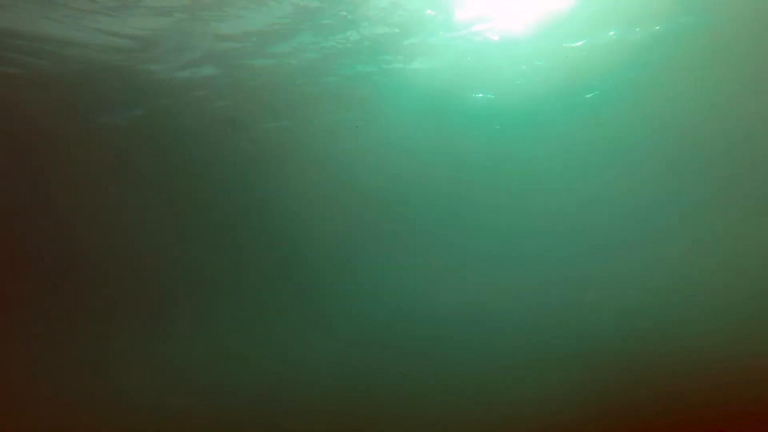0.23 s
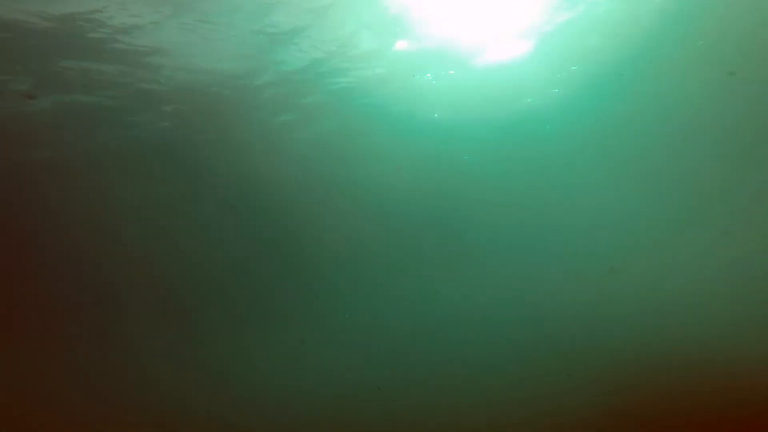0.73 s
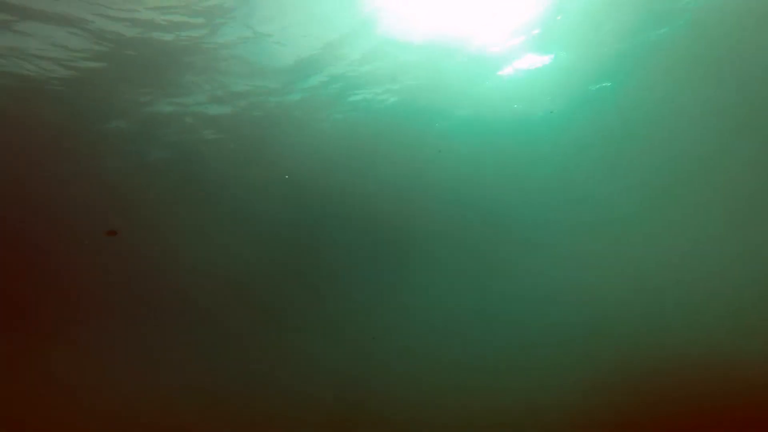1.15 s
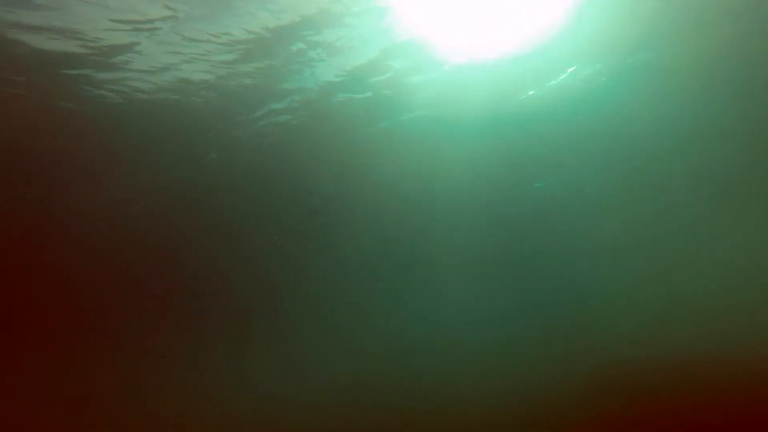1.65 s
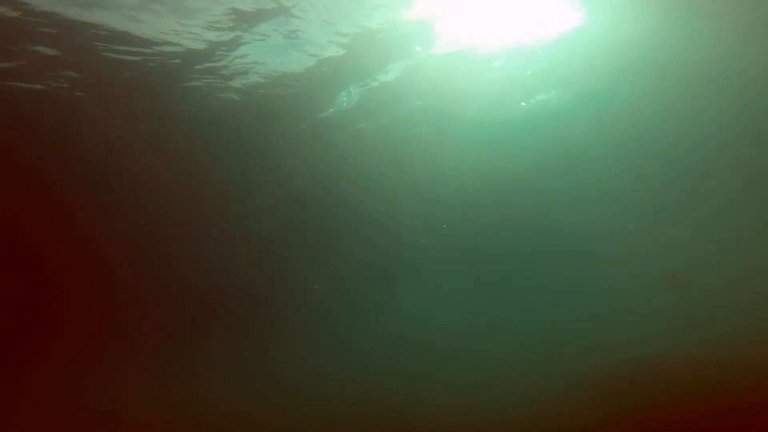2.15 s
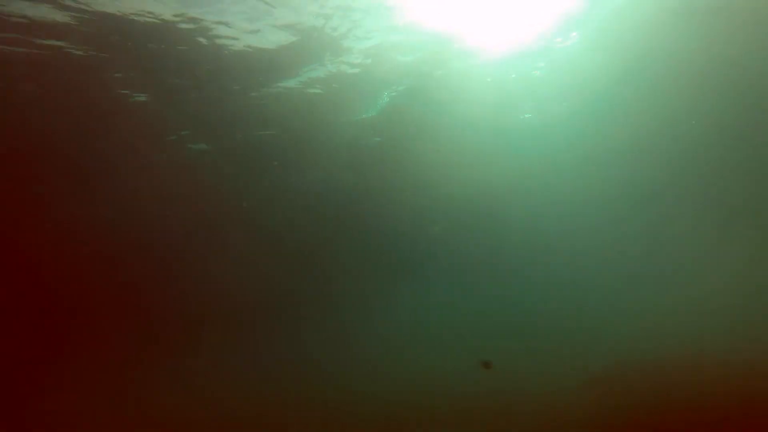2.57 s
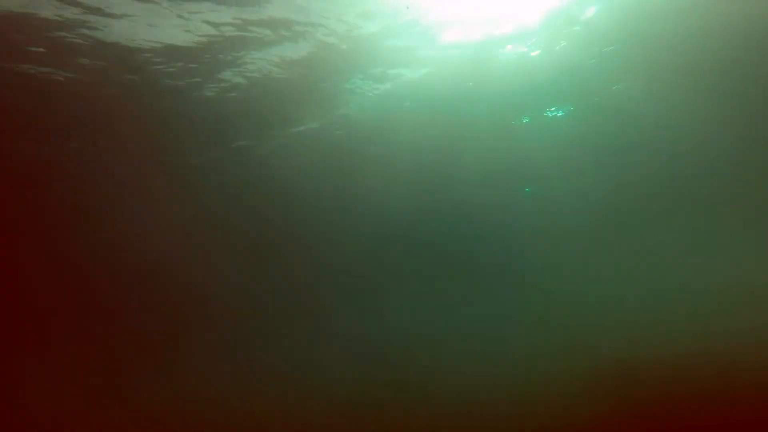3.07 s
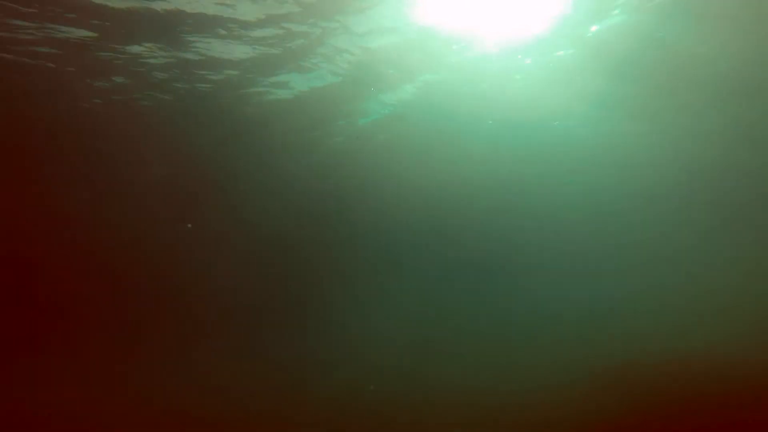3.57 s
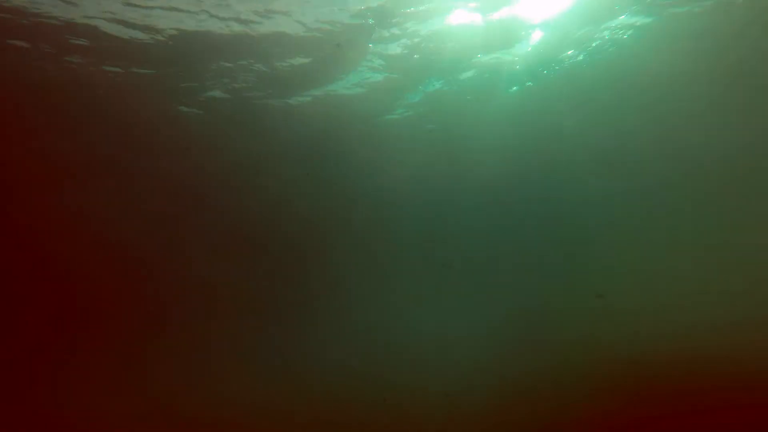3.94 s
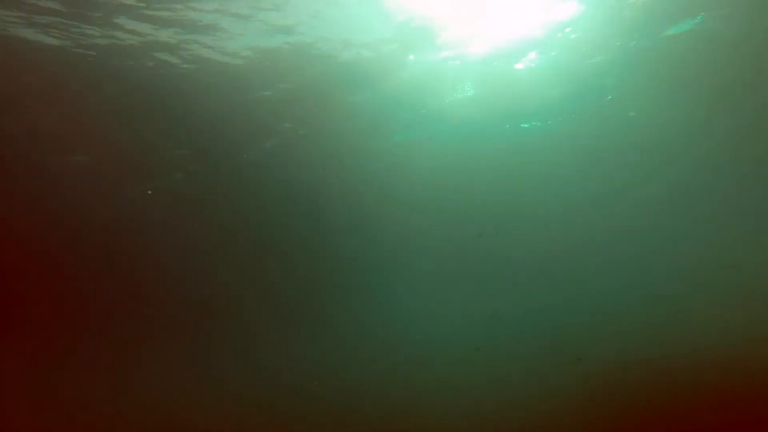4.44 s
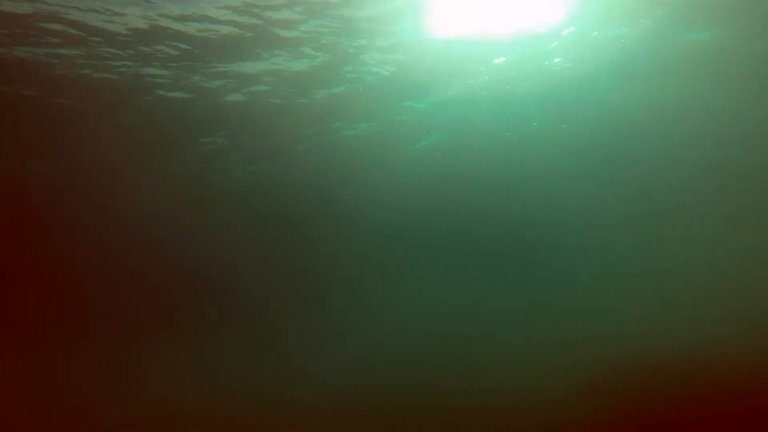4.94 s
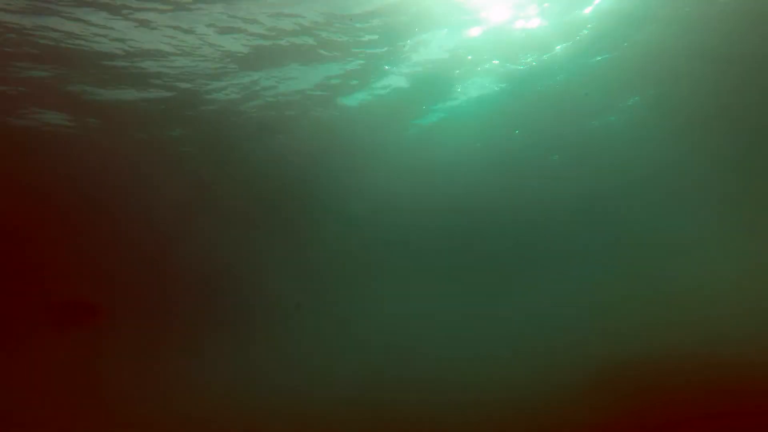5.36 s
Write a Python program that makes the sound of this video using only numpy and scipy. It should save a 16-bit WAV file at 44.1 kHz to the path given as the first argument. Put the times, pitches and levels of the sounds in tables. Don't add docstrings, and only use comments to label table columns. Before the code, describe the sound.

Muffled stones tumble on a sea floor, knocking a hollow housing and ticking sharply, as an early rumble of current fades away.

```python
import sys
import numpy as np
from scipy import signal
from scipy.fft import rfft, irfft, next_fast_len
from scipy.io import wavfile
from scipy.ndimage import uniform_filter1d

SR = 44100
rng = np.random.default_rng(int(sys.argv[2]) if len(sys.argv) > 2 else 0)


def output_pcm(signal):
    pcm = np.clip(np.atleast_2d(signal).T, -1, 1) * 32767
    wavfile.write(sys.argv[1], SR, np.round(pcm).astype(np.int16))


def volts_from_decibels(level):
    exponent = np.asarray(level, float) / 20
    return 10 ** exponent


N = 246959
SPLIT_HZ, TOP_HZ, EDGE_HZ = 4200, 11500, 15280


def evened(x):
    return x / np.sqrt(np.mean(x ** 2) + 1e-20)


def curve(rows):
    return np.interp(np.arange(N) / SR, *np.transpose(rows))


def add(mix, s, sound):
    part = mix[max(round(s * SR), 0):][:len(sound)]
    part += sound[:len(part)]


def burst(ms, rise, fall):
    t = np.arange(-2 * ms, 6 * ms, 1000 / SR) / ms
    shape = np.where(t < 0, np.exp(-(t / rise) ** 2), 1 / np.cosh(t / fall))
    return t * ms / 1000, shape


def lingering(x, rings):
    after = 0
    for hz, width, db in rings:
        after = after + volts_from_decibels(db) * signal.lfilter(*signal.iirpeak(hz, hz / max(width, 5), SR), x)
    return x + after


def above(x, hz, soft):
    size = next_fast_len(len(x) + SR // 4)
    step = np.tanh((np.fft.rfftfreq(size, 1 / SR) - hz) / soft)
    return irfft(rfft(x, size) * (1 + step) / 2, size)[:len(x)]


def colour(x, points, size=8192):
    f, db = np.transpose(points)
    hz = abs(np.fft.fftfreq(size, 1 / SR))
    gain_db = np.interp(np.log(hz + 1), np.log(f + 1), db)
    log_gain = np.log(volts_from_decibels(np.maximum(gain_db, -100)))
    taps = np.fft.ifft(np.exp(np.conj(signal.hilbert(log_gain)))).real[:size // 2]
    led_in = np.concatenate([x[-len(taps):], x])
    return signal.oaconvolve(led_in, taps / np.linalg.norm(taps))[len(taps):][:len(x)]


def scrambled(x):
    z = signal.stft(x, nperseg=128)[2]
    z = z * np.exp(2j * np.pi * rng.random(z.shape[::-1]).T)
    return signal.istft(z, nperseg=128)[1][:N]


def thuds(stones):
    # (pitch [Hz], width [Hz], level [dB])
    bed_ring = [(198, 98, -11.5), (308.5, 30, -6.5)]
    small, deep = np.zeros((2, N))
    for (s, db, hz, ms), (a, b) in zip(stones, rng.random((len(stones), 2))):
        t, shape = burst(ms, rise=0.45, fall=0.26)
        turns = hz * t * (1 - 1.4 * t)
        cycles = np.sin(2 * np.pi * (turns + a)) + 0.27 * np.sin(2 * np.pi * (1.48 * turns + b))
        add(deep if hz < 140 else small, s + t[0], volts_from_decibels(db - 2.5) * shape * cycles)
    return above(lingering(small, bed_ring), 133.5, soft=14) + above(deep, 75, soft=18)


def falling_stones():
    # (peak time [s], peak level [dB], pitch [Hz], length [ms])
    heavy = [(0.094, -30, 270, 8.7), (0.3, -32, 253, 3.5), (0.49, -30, 236, 2.8), (0.503, -28, 189, 10.6),
             (0.549, -29.5, 176, 13), (0.551, -33, 352, 10), (0.555, -25.5, 131, 21.5),
             (0.568, -27, 184, 3.4), (0.965, -30.5, 223, 8.7), (0.98, -22.5, 207, 5),
             (1.204, -35.5, 109.6, 45), (1.283, -29, 280, 4.9), (1.309, -31, 217, 3.6),
             (1.341, -29, 224, 3.3), (1.779, -34.5, 386, 13.6), (2.257, -33.5, 290, 7.3),
             (2.289, -38.5, 174, 12.5), (2.551, -32.5, 270, 6.2), (2.687, -34.5, 248, 11),
             (2.807, -25, 298, 5.3), (2.84, -30.5, 233, 7.6), (3.056, -39, 109.4, 53),
             (3.165, -37, 244, 7.9), (3.52, -31, 220, 4.5), (3.537, -28, 172, 11), (3.571, -29, 333, 10.6),
             (3.847, -28, 172, 10), (3.867, -39.5, 186, 36), (4.816, -24.5, 193, 12), (5.006, -40, 315, 13)]
    # (peak time [s], peak level [dB], pitch [Hz])
    pebbles = [(0.176, -39, 284), (0.44, -33, 292), (0.707, -39, 142), (1.481, -36.5, 308),
               (1.621, -43.5, 307), (1.95, -42, 360), (2.001, -36, 355), (2.138, -36, 260),
               (2.167, -42, 256), (2.369, -38, 270), (2.422, -43, 343), (2.922, -39, 165), (2.97, -42, 260),
               (3.042, -36.5, 162), (3.27, -35.5, 243), (3.337, -42.5, 248), (3.395, -40, 235),
               (3.598, -41.5, 224), (3.783, -39.5, 354), (3.83, -42, 236), (3.955, -38, 260),
               (3.984, -37.5, 290), (4.026, -42, 245), (4.188, -40, 198), (4.194, -38.5, 430),
               (4.324, -39.5, 241), (4.455, -44, 235), (4.628, -42.5, 250), (4.981, -43, 266),
               (5.325, -43, 252), (5.529, -42.5, 257)]
    # (peak time [s], peak level [dB], pitch [Hz])
    nudges = [(0.255, -44, 255), (0.36, -43, 295), (0.4, -37, 298), (0.47, -44, 199), (0.524, -40, 265),
              (0.585, -47, 297), (0.617, -52, 276), (0.657, -40.5, 195), (0.843, -46, 215),
              (0.902, -44, 240), (0.94, -42, 260), (0.996, -49, 202), (1.016, -42, 308), (1.04, -42, 201),
              (1.107, -39.5, 252), (1.194, -36.5, 293), (1.237, -41.5, 344), (1.252, -45, 240),
              (1.324, -44, 272), (1.375, -52, 308), (1.435, -42.0, 258), (1.524, -43.5, 352),
              (1.691, -40.5, 350), (1.708, -48, 356), (1.751, -43, 302), (1.88, -58, 286),
              (1.919, -44.5, 343), (2.08, -43, 366), (2.203, -47, 333), (2.219, -62, 279),
              (2.339, -38.5, 386), (2.463, -46, 280), (2.565, -54, 256), (2.654, -46, 292),
              (2.779, -46, 272), (2.857, -45, 258), (2.903, -41.5, 287), (3.104, -47, 277),
              (3.119, -42.5, 293), (3.194, -49, 267), (3.225, -48, 242), (3.413, -44, 259),
              (3.465, -44.5, 304), (3.717, -39, 295), (3.766, -40.5, 328), (3.884, -42, 188),
              (3.937, -44.5, 296), (4.066, -45.5, 288), (4.108, -47, 296), (4.291, -44, 240),
              (4.513, -44, 273), (4.54, -43.5, 274), (4.7, -47, 266), (4.72, -46, 273), (4.838, -50, 189),
              (4.992, -48, 297), (5.04, -41, 243), (5.082, -42, 309), (5.176, -47, 314), (5.261, -43, 254)]
    stones = heavy + [(s, db, hz, 1000 * 2.54 / hz) for s, db, hz in pebbles]
    stones += [(s, db - 0.45, hz, 1000 * 2.58 / hz) for s, db, hz in nudges]
    return thuds(stones)


def shoved_stones():
    # (peak time [s], peak level [dB], pitch [Hz])
    shoves = [(0.491, -34, 144), (0.5235, -54, 111), (0.5966, -46, 130), (0.6994, -34, 96),
              (0.7336, -51, 96), (0.8235, -39, 84), (0.9014, -45, 108), (0.984, -35, 126),
              (1.047, -38.5, 117), (1.102, -39, 128), (1.289, -38, 93)]
    # (peak time [s], peak level [dB], pitch [Hz])
    slides = [
        (0.248, -46, 261),
        (0.3624, -40.5, 300),
        (0.486, -35, 297),
    ]
    return thuds([(s, db + 3.5, hz, 1000 * 1.9 / hz) for s, db, hz in shoves + slides])


def knocks():
    # (peak time [s], peak level [dB], pitch [Hz], length [ms])
    strong = [(0.139, -32.5, 670, 3), (0.169, -31, 754, 3.1), (0.22, -32.5, 844, 5.5),
              (0.239, -39, 840, 7.9), (0.432, -37, 823, 9.1), (0.481, -35, 903, 8.8),
              (0.497, -31.5, 774, 5.5), (0.533, -38, 676, 9.3), (0.542, -26.5, 820, 5.4),
              (0.55, -26, 876, 7), (0.578, -23.5, 815, 3.6), (0.617, -31.5, 670, 6.8),
              (0.984, -36.5, 838, 7.9), (1.015, -39.5, 816, 7.4), (1.699, -34, 710, 1.8),
              (1.712, -46, 824, 29), (1.779, -36.5, 720, 5.7), (2.104, -41, 800, 4.2),
              (2.112, -37.5, 798, 8.4), (2.375, -40.5, 855, 9), (2.775, -37, 860, 3.2),
              (2.79, -44.5, 781, 33), (3.058, -44.5, 839, 26), (3.161, -28.5, 838, 2.6),
              (3.27, -31, 823, 5.2), (3.38, -35, 835, 4.3), (3.391, -40.5, 810, 9.3),
              (3.564, -38, 633, 6.9), (3.611, -41, 810, 3.5), (3.849, -29, 802, 6.9)]
    # (peak time [s], peak level [dB])
    taps = [(0.263, -42), (0.466, -46), (0.521, -47), (0.706, -41), (0.808, -40.5), (1.211, -42),
            (1.283, -45.5), (1.606, -46.5), (2.122, -42), (2.228, -43.5), (2.399, -40), (2.526, -43),
            (2.542, -42), (2.705, -44), (2.752, -45.5), (3.043, -42.5), (3.078, -42), (3.146, -39.5),
            (3.866, -45), (3.942, -47), (3.987, -46), (4.19, -43.5), (4.647, -48), (4.746, -41),
            (4.97, -47.5), (5.257, -44.5), (5.35, -40.5), (5.557, -42.5)]
    # (peak time [s], peak level [dB], pitch [Hz])
    patters = [(0.153, -41, 715), (0.252, -43, 794), (0.271, -45, 839), (0.442, -44, 850),
               (0.511, -36, 765), (0.567, -36, 736), (0.653, -46.5, 790), (0.719, -50, 840),
               (1.0, -45, 856), (1.025, -47.5, 900), (1.222, -44, 765), (1.236, -46.0, 806),
               (1.263, -44, 760), (1.291, -42, 654), (1.554, -46.5, 815), (1.671, -48, 776),
               (1.722, -43, 854), (1.751, -49, 840), (1.79, -42, 810), (1.798, -48, 786),
               (1.862, -46.5, 800), (1.879, -48.5, 770), (1.95, -48, 744), (1.991, -49, 834),
               (2.093, -44.5, 917), (2.154, -45.5, 810), (2.165, -49, 786), (2.265, -46, 770),
               (2.346, -42, 775), (2.418, -46.0, 790), (2.557, -43, 830), (2.639, -43, 680),
               (2.687, -44, 775), (2.716, -43, 760), (2.799, -46, 830), (2.812, -51, 790),
               (3.192, -44, 780), (3.302, -45.5, 800), (3.34, -44, 760), (3.401, -39.5, 800),
               (3.597, -41, 811), (3.604, -39, 830), (3.618, -53, 805), (3.784, -45, 750),
               (3.887, -44, 840), (3.899, -46, 796), (3.919, -47, 830), (3.93, -45, 790),
               (4.016, -48.0, 775), (4.052, -49, 800), (4.142, -47.5, 806), (4.201, -49, 770),
               (4.233, -46.0, 807), (4.587, -46, 810), (4.754, -52, 820), (4.816, -43.5, 760),
               (4.834, -44, 780), (4.904, -47.5, 850), (5.267, -47.5, 860), (5.276, -57, 860)]
    # (pitch [Hz], width [Hz], level [dB])
    housing_ring = [(760, 30, -10.5), (872, 31, -7.5)]
    tap_hz, tap_ms, patter_ms = 815, 7.8, 6.3
    blows = strong + [(s, db, tap_hz, tap_ms) for s, db in taps]
    blows += [(s, db - 0.3, hz, patter_ms) for s, db, hz in patters]
    ratios, sizes = (1.008, 0.797, 1.326, 1.586), (1.28, 0.39, 0.33, 0.15)
    out = np.zeros(N)
    for (s, db, hz, ms), phases in zip(blows, rng.random((len(blows), 4))):
        t, shape = burst(ms, rise=0.24, fall=0.51)
        modes = sum(g * np.sin(2 * np.pi * (r * hz * t + a)) for r, g, a in zip(ratios, sizes, phases))
        add(out, s + t[0], volts_from_decibels(db - 4.5) * shape * modes)
    return lingering(out, housing_ring)


def ticks():
    # (time [s], bright part [dB], dull part [dB], chip pitch [Hz])
    sharp = [(0.342, -50, -86, 6060), (0.416, -51, -75, 8700), (0.477, -70, -64, 5390),
             (0.4937, -62, -67, 5040), (0.5092, -54, -66, 7610), (0.5372, -63, -77, 5300),
             (0.5458, -48, -46.5, 5500), (0.575, -51, -47, 4700), (0.633, -55, -71, 6260),
             (0.7034, -66, -86, 8440), (0.7315, -73, -67.5, 8590), (0.801, -48.5, -73, 8200),
             (0.9844, -46.5, -66, 8200), (1.5672, -56, -68, 6700), (2.102, -52, -66, 8500),
             (2.2273, -43, -64, 8200), (2.4098, -53, -74, 9100), (2.4474, -48.5, -81, 12600),
             (2.5405, -52, -65, 8800), (2.464, -68, -78, 8600), (3.266, -47, -67, 6240),
             (3.3772, -41.5, -60.5, 9300), (3.438, -52, -74, 8450), (3.5845, -48, -90, 8660),
             (3.847, -42.5, -75, 8840), (3.8488, -49, -66, 6140), (3.993, -56, -84, 4560),
             (5.2712, -54, -80, 8000)]
    # (time [s], bright part [dB])
    chips = [(0.396, -50.5), (1.627, -53), (1.67, -53), (1.69, -52), (1.7794, -47), (2.51, -51),
             (2.714, -47), (3.2067, -50), (3.42, -46.5), (4.1624, -52), (4.3688, -47), (4.6268, -52),
             (4.69, -52), (4.739, -54), (4.831, -48.5), (5.071, -48.5), (5.227, -53.5), (5.3128, -50.5)]
    # (time [s], bright part [dB], dull part [dB], chip pitch [Hz])
    snaps = [
        (0.588, -32, -59, 9800),
        (1.8984, -38.5, -64.5, 7740),
        (3.1591, -34.5, -51, 5900),
        (3.7936, -41.5, -63, 4600),
        (4.031, -66, -67, 5000),
        (2.6, -50, -78, 8100),
        (3.159, -56, -68, 4600),
    ]
    # (frequency [Hz], level [dB per Hz])
    crack_colour = [(900, -77), (1500, -29), (2080, -14), (2400, -10.5), (3350, -6.5), (4030, -22.5),
                    (6000, -19.5), (7900, -18), (11000, -24.5), (12400, -9.5), (15600, -21)]
    # (pitch [Hz], level [dB], 60 dB decay [s])
    wall_modes = [(1338, 6.5, 0.082), (1785, 2, 0.061), (2290, -8.5, 0.037), (2800, -2, 0.1),
                  (3450, -33, 0.055)]
    cracks = [(*row, 0) for row in sharp]
    cracks += [(s, db, db - 35, 8900, 0) for s, db in chips]
    cracks += [(*row, -26) for row in snaps]
    dull, bright, wall, jolt = np.zeros((4, N))
    t = np.arange(2000) / SR
    draws = rng.standard_normal((len(cracks), 2, 2000))
    for (s, bright_db, dull_db, hz, ring_db), (z, w) in zip(cracks, draws):
        z = np.sign(z) * (0.51 + 1.15 * abs(z))
        z[0] = 6.5
        chip = 0.3 * z + 1.9 * np.cos(2 * np.pi * hz * t) * uniform_filter1d(w, size=12)
        add(dull, s + 0.00086, volts_from_decibels(dull_db - 60 * t / 0.013) * z)
        add(jolt, s + 0.000806, volts_from_decibels(ring_db + 0.58 * dull_db - 60 * t / 0.0077) * z)
        add(wall, s + 0.00066, volts_from_decibels(ring_db + 0.43 * dull_db - 3 - 60 * t / 0.11) * w)
        tail_db = ring_db - 13.5 - 0.27 * (bright_db + 45.5)
        fading = volts_from_decibels(-60 * t / 0.0067) + volts_from_decibels(tail_db - 60 * t / 0.14)
        add(bright, s + 0.0008, volts_from_decibels(bright_db) * chip * fading)
    modes = sum(volts_from_decibels(db - 60 * t / t60) * np.sin(2 * np.pi * hz * t) for hz, db, t60 in wall_modes)
    ringing = volts_from_decibels(-50) * signal.oaconvolve(jolt, modes)[:N]
    dull, bright = colour(dull, crack_colour), colour(bright, crack_colour)
    wall = signal.lfilter(*signal.iirpeak(3200, 5.5, SR), wall)
    dulling = bed(level_db=-12, share=0, pile_db=0, muffle_db=-6, drift_db=0) - 1
    bright = bright + dulling * above(bright, TOP_HZ, soft=1000)
    dull = volts_from_decibels(6) * (dull - above(dull, SPLIT_HZ, soft=4600))
    return ringing + dull + volts_from_decibels(-22) * wall + above(bright, SPLIT_HZ, soft=820)


def clanks():
    # (time [s], upper modes [dB], lower modes [dB])
    wall_blows = [(0.4778, -62, -56), (0.4938, -60, -53), (0.538, -63, -63), (0.5458, -56.5, -41.5),
                  (0.553, -61, -51), (0.633, -64, -66), (3.1604, -60, -51.5), (3.266, -57.5, -54),
                  (3.8469, -55, -46), (5.228, -69, -85), (5.2713, -60.5, -80), (5.313, -71, -85),
                  (0.984, -69, -53), (1.425, -82, -58), (2.374, -82, -57), (2.782, -82, -62)]
    # (pitch [Hz], level [dB])
    lower = [(1330, 0.5), (1850, -8.5)]
    # (pitch [Hz], level [dB])
    upper = [(2420, 4.5), (2900, 6), (3400, 0.5), (4600, -4.5)]
    lower_t60, upper_t60 = 0.057, 0.018
    out, t = np.zeros(N), np.arange(2000) / SR
    spots = rng.standard_normal((len(wall_blows), len(lower + upper)))
    for (s, high_db, low_db), spot in zip(wall_blows, spots):
        modes = [(hz, db + low_db, lower_t60) for hz, db in lower]
        modes += [(hz, db + high_db, upper_t60) for hz, db in upper]
        ring = 0
        for (hz, db, t60), spot_db in zip(modes, spot):
            ring = ring + volts_from_decibels(db + spot_db - 60 * t / t60) * np.sin(2 * np.pi * hz * t)
        add(out, s, ring * np.minimum(t / 0.0015, 1))
    return out


def grit():
    # (peak time [s], peak level [dB], pitch [Hz])
    flicks = [(0.117, -67, 3014), (0.1346, -62, 2559), (0.166, -61.5, 2400), (0.345, -61, 3023),
              (0.43, -63, 2506), (0.5313, -59, 2656), (0.705, -59, 2790), (0.8095, -64, 3381),
              (0.9995, -68, 2768), (1.431, -63, 2957), (1.5771, -65.5, 3020), (1.6287, -65, 2894),
              (1.7032, -64, 3136), (1.9902, -66.0, 2890), (2.4827, -65, 2874), (2.512, -64.0, 2924),
              (2.718, -61, 2815), (2.994, -61, 3200), (3.0415, -62, 2746), (3.0537, -64, 3190),
              (3.1605, -43, 2550), (3.16, -41.5, 3330), (3.16, -46, 4530), (3.1598, -48, 5600),
              (4.909, -63, 2750), (0.7488, -67, 3107), (3.303, -63, 3063), (3.3804, -52, 3120),
              (3.4384, -62, 3140), (3.7937, -66, 3070), (4.1566, -64, 3010)]
    out = np.zeros(N)
    t, shape = burst(ms=1.84, rise=0.15, fall=0.43)
    for (s, db, hz), (a, b) in zip(flicks, rng.random((len(flicks), 2))):
        clash = 0.61 * np.sin(2 * np.pi * (1.06 * hz * t + b))
        add(out, s + t[0], volts_from_decibels(db + 0.5) * shape * (np.sin(2 * np.pi * (hz * t + a)) + clash))
    return out


def rattle(per_s, spread_db, t60, smooth):
    sizes = volts_from_decibels(spread_db * np.minimum(rng.exponential(1, N), 2.5))
    hits = sizes * (rng.random(N) < per_s / SR)
    tail = volts_from_decibels(-120 * np.arange(3000) / SR / t60)
    power = signal.oaconvolve(hits ** 2, tail)[:N]
    power = abs(power) / power.mean() * (1 - min(smooth, 1)) + min(smooth, 1)
    return np.sqrt(power) * rng.standard_normal(N)


def bed(level_db, share, pile_db, muffle_db, drift_db):
    # (time [s], level [dB])
    stir = [(0, 4.5), (0.45, 2.5), (0.66, 0), (0.9, 1.5), (1.2, -2), (1.5, -2), (1.8, 1.5), (2, -1.5),
            (2.2, 2.5), (2.6, 0.5), (2.8, 0), (3, 1), (3.3, 1.5), (3.6, 1), (3.9, 2.5), (4.5, -3),
            (4.9, -0.5), (5.6, -2.5)]
    t = np.arange(N) / SR
    pile = np.exp(-((t - 0.535) / 0.054) ** 2)
    since = t - 0.97
    muffle = np.exp(-abs(since / np.where(since < 0, 0.32, 0.2)) ** 4.6)
    return volts_from_decibels(level_db + share * curve(stir) + pile_db * pile + muffle_db * muffle + drift_db * t)


def gravel():
    # (frequency [Hz], level [dB per Hz])
    roll_colour = [(55, -56.5), (100, -35.5), (150, -5), (290, -7), (345, -3.5), (390, -17), (460, -15.5),
                   (620, -36.5), (1100, -100)]
    # (frequency [Hz], level [dB per Hz])
    ring_colour = [(345, -36.5), (450, -8), (588, -9), (745, -0.5), (842, 0.5), (973, -9.5), (1330, -19),
                   (1490, -30), (1800, -29), (2340, -52), (3960, -120)]
    roll = evened(colour(rattle(per_s=150, spread_db=5.5, t60=0.019, smooth=0.4), roll_colour))
    ring = evened(colour(rattle(per_s=290, spread_db=7, t60=0.12, smooth=0.52), ring_colour))
    roll = bed(level_db=-57, share=1.6, pile_db=15, muffle_db=0, drift_db=0.09) * roll
    return roll + bed(level_db=-58.5, share=0.96, pile_db=17, muffle_db=-3.5, drift_db=-0.06) * ring


def sand():
    # (frequency [Hz], level [dB per Hz])
    hiss_colour = [(900, -32.5), (1500, -9.5), (2100, -13.5), (2900, -12.5), (3450, -13), (4030, -19),
                   (4500, -10), (7000, -9.5), (8500, -2.5), (10000, -8), (11300, -12.5), (12100, -12),
                   (15200, -21.5)]
    shared = rattle(per_s=70, spread_db=5.5, t60=0.01, smooth=0.75)
    own = [rattle(per_s=73, spread_db=8, t60=0.085, smooth=0.17) for _ in range(3)]
    dull, bright, top = (colour(shared + 0.64 * grains, hiss_colour) for grains in own)
    dull = dull - above(dull, SPLIT_HZ, soft=310)
    bright = above(bright, SPLIT_HZ, soft=130) - above(bright, TOP_HZ, soft=980)
    top = above(top, TOP_HZ, soft=1100) - above(top, EDGE_HZ, soft=55)
    hiss = bed(level_db=-76.5, share=-0.14, pile_db=4, muffle_db=-4, drift_db=-0.99) * evened(dull)
    hiss += bed(level_db=-76, share=-0.15, pile_db=6, muffle_db=-2.5, drift_db=-0.02) * evened(bright)
    hiss += bed(level_db=-88, share=0.6, pile_db=7, muffle_db=-13, drift_db=0.83) * evened(top)
    return volts_from_decibels(1.24) * hiss


def surge():
    # (time [s], level [dB])
    strength = [(0, -58.5), (0.12, -59), (0.27, -45.5), (0.38, -54), (0.53, -39.5), (0.75, -41.5),
                (1.05, -47), (1.3, -42), (1.42, -48.5), (1.75, -57.5), (2.3, -60.5), (2.9, -69), (3.2, -68),
                (3.6, -71.5), (4.4, -79), (5.6, -91)]
    # (frequency [Hz], level [dB per Hz])
    rumble_colour = [(7.1, -23), (12, 6), (27, 5.5), (65, 1), (107, 3), (151, 1), (200, -22), (260, -14.5),
                     (440, -120)]
    return volts_from_decibels(curve(strength)) * evened(colour(rng.standard_normal(N), rumble_colour, size=32768))


def scene():
    cracks = ticks()
    mono = falling_stones() + shoved_stones() + knocks() + cracks + clanks() + grit()
    mono = mono + gravel() + sand() + surge()
    side = volts_from_decibels(-20) * scrambled(cracks)
    return np.array([mono + side, mono - side])


def ducked(dry):
    since = np.arange(N) / SR - 0.553
    dip = volts_from_decibels(-21.5 * np.exp(-abs(since / 0.063) ** 2.5) * np.clip(since / 0.0023, 0, 1))
    return np.array([port + (dip - 1) * above(port, 970, soft=740) for port in dry])


def narrowed(x):
    shut_s, lowest_s, open_s = 0.6, 0.95, 1.45
    shut_hz, rise_hz, ragged_hz = 14000, 900, 900
    hz, t, z = signal.stft(x, SR, nperseg=512)
    strips = rng.standard_normal((len(t), len(hz))).T
    strips = uniform_filter1d(strips, size=2, axis=0)
    strips = evened(uniform_filter1d(strips, size=10, axis=1))
    climb = np.maximum(t - lowest_s, 0) / (open_s - lowest_s)
    edge = shut_hz + rise_hz * climb + ragged_hz * strips
    shut = (t > shut_s) * (t < open_s) * (1 + np.tanh((hz[:, None] - edge) / 200)) / 2
    return signal.istft(z * volts_from_decibels(-13 * shut), SR, nperseg=512)[1][:, :N]


def top_cut(x):
    return signal.sosfilt(signal.butter(12, 15710, fs=SR, output="sos"), x)


def record(dry):
    dry = narrowed(ducked(dry))
    side = above(scrambled(dry.mean(0)), TOP_HZ, soft=130)
    side = volts_from_decibels(-0.7) * (side - above(side, EDGE_HZ, soft=40))
    return top_cut(dry + np.array([side, -side]))


dry = scene()
out = record(dry)
output_pcm(out)
```